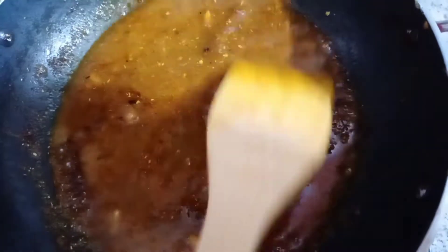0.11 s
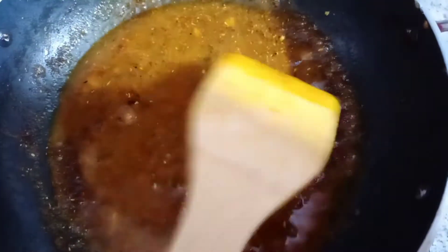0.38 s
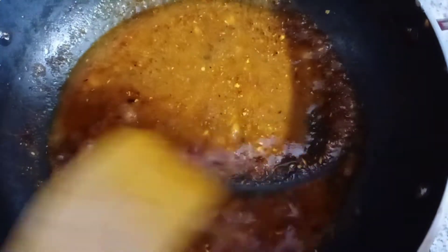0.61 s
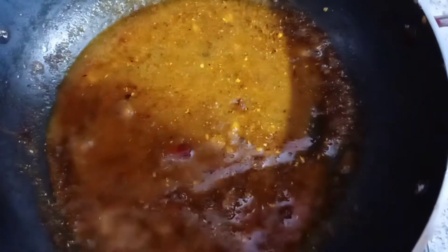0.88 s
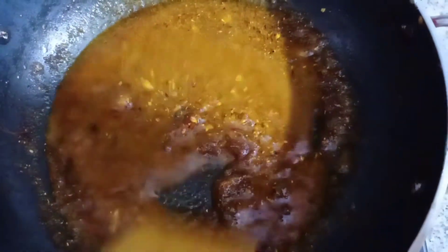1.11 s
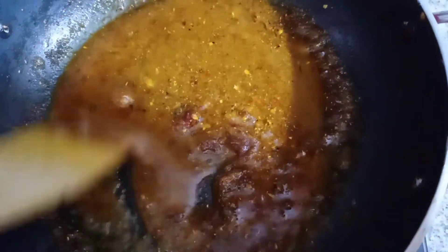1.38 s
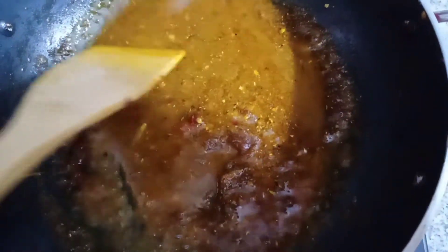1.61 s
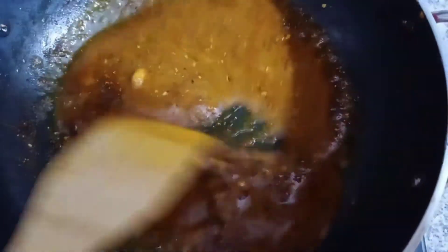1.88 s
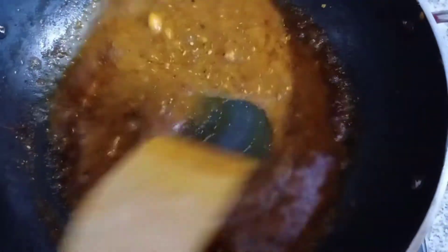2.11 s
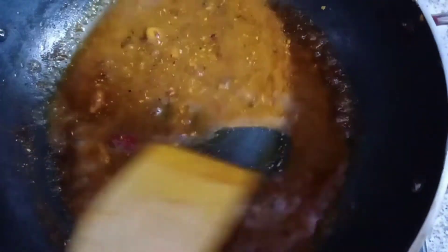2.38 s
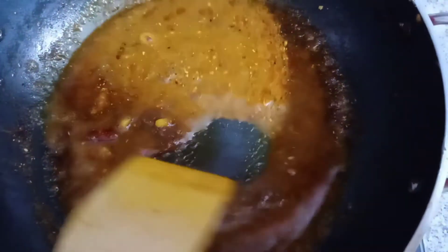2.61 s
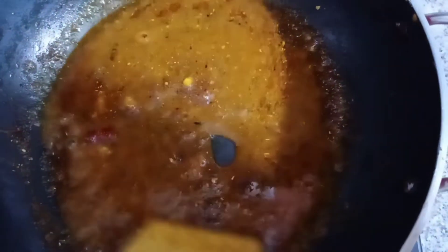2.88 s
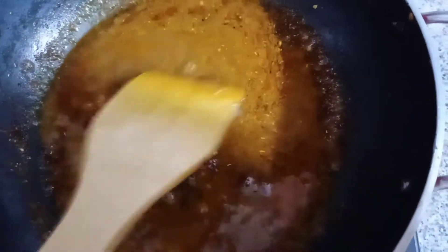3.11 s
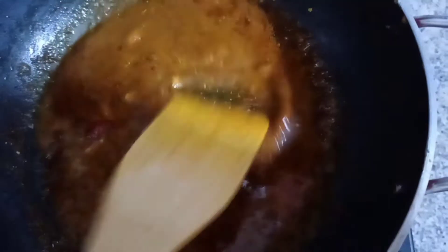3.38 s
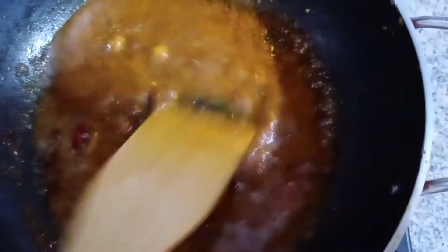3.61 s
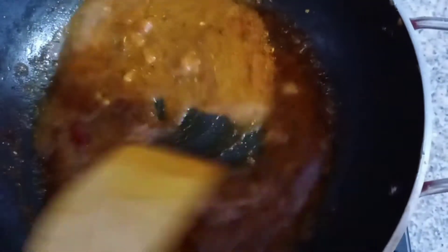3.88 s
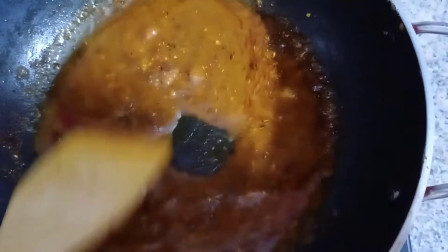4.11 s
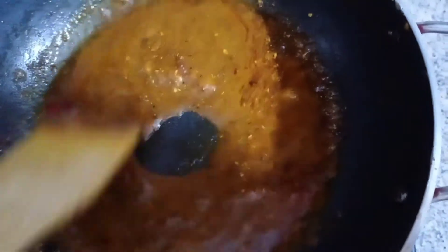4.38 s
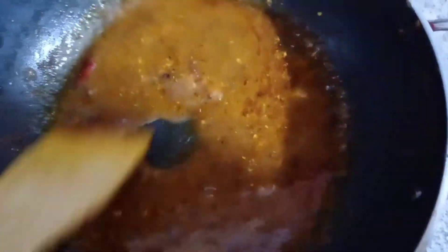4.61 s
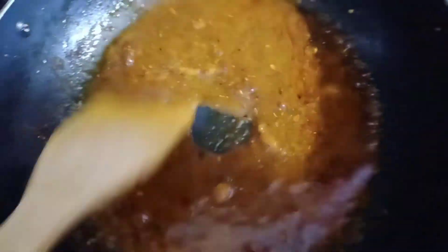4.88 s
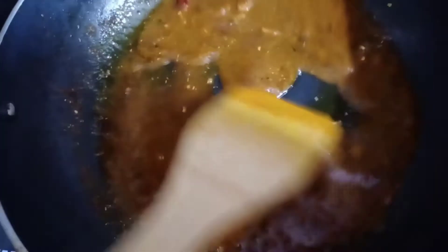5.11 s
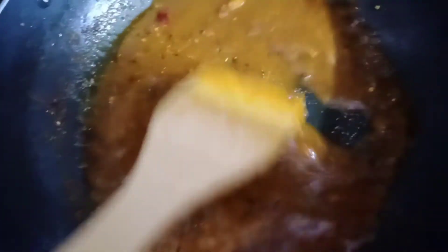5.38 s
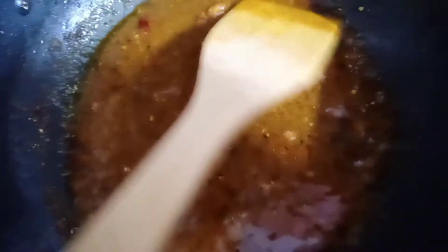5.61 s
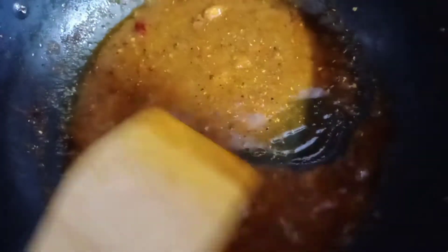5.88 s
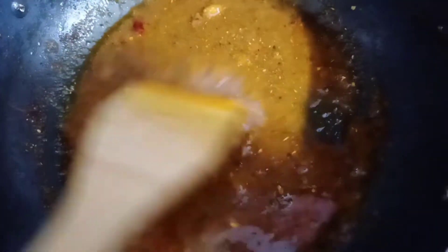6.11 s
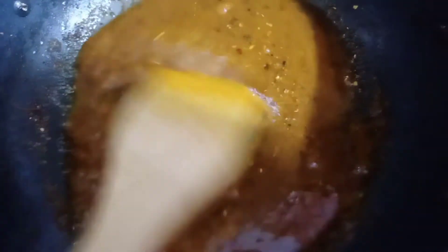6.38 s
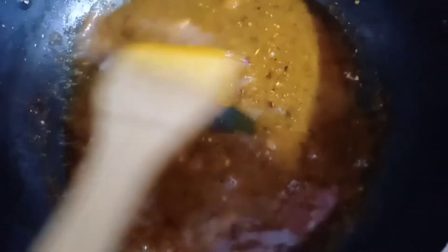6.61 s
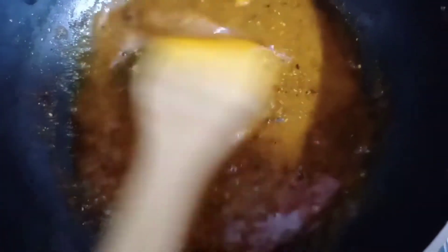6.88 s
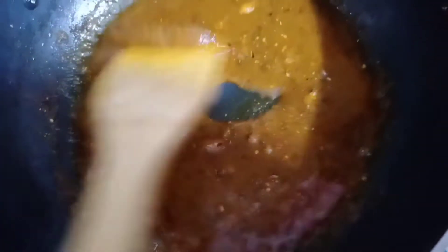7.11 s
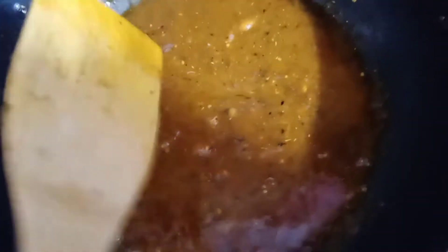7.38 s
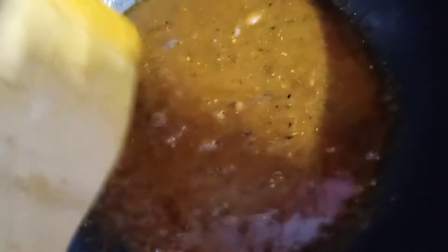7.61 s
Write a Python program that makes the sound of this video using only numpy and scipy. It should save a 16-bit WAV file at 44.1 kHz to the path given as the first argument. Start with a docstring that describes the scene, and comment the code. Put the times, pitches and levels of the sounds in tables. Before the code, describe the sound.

Thin sauce sizzles and fizzes steadily in a pan, close up, with wet bubble pops, hollow pan hums and soft dull wooden spatula scrapes.

```python
"""Thin sauce sizzling in a pan

Heard close to a phone: bubbles burst in clumps (tiny damped sines and patchy noise), fat spits in the treble.
A wooden spatula scrapes the bottom (filtered noise); boiling and nudges make the pan hum at its lowest mode.
A low kitchen rumble (filtered noise) lies beneath. Two microphone ports colour most of the sound differently.
"""
import sys
import numpy as np
from scipy import signal
from scipy.fft import rfft, irfft, next_fast_len
from scipy.io import wavfile
from scipy.ndimage import uniform_filter1d, map_coordinates

SR = 44100
rng = np.random.default_rng(int(sys.argv[2]) if len(sys.argv) > 2 else 0)


def field_ratio(decibels):
    """Amplitude ratio for a level in dB (20 dB per decade); scalars and array-likes work."""
    return 10 ** (np.asarray(decibels, dtype=float) / 20)


def store_wav(level_fs):
    """Save 16-bit WAV to argv[1]."""
    pcm = np.round(np.clip(np.atleast_2d(level_fs), -1, 1) * 32767)
    wavfile.write(sys.argv[1], SR, pcm.T.astype(np.int16))


N = 341851  # length in samples
TOP_HZ = 15500  # the phone's band limit

# modes of the pan, lowest first; that one's gain is not used: (pitch [Hz], width [Hz], gain [dB])
PAN_MODES = [(908, 67, 9), (1416, 22, 3.5), (1760, 30, -4), (1950, 210, -3.5), (2470, 34, -7)]


def unit(x):
    """Scaled to rms 1."""
    return x / np.sqrt(np.mean(x ** 2) + 1e-20)


def along(points, hz):
    """Each column after the first, read on a log frequency axis."""
    f, *cols = np.transpose(points)
    return np.array([np.interp(np.log(hz + 1), np.log(f + 1), c) for c in cols])


def curves(rows):
    """One value per sample for each column after the time."""
    s, *cols = np.transpose(rows)
    return [np.interp(np.arange(N) / SR, s, c) for c in cols]


def wobble(rate):
    """A smooth random curve, rate knots a second."""
    return map_coordinates(rng.standard_normal(N // 100), [np.arange(N) * rate / SR])


def flutter(rate):
    """A wobble without its slow drift."""
    x = wobble(rate)
    return x - uniform_filter1d(x, size=SR // 17)


def filtered(x, response):
    """x times a response of frequency."""
    m = next_fast_len(N + SR // 2)
    return irfft(rfft(x, m) * response(np.fft.rfftfreq(m, 1 / SR)), m)[..., :N]


def above(f, hz):
    """Steep high-pass gain."""
    return 1 / np.sqrt(1 + (hz / (f + 1)) ** 12)


def below(f, hz):
    """The matching low-pass gain: the powers of the two add up to 1."""
    return np.sqrt(1 - above(f, hz) ** 2)


def resonance(f, hz, width):
    """Causal resonance, gain 1 at its centre."""
    return 1j * f * width / (hz * hz - f * f + 1j * f * width)


def place(seconds, shapes):
    """Sums the rows of shapes, each starting at its time."""
    at = np.round(np.asarray(seconds) * SR).astype(int)[:, None] + np.arange(shapes.shape[1])
    return np.bincount(at.ravel(), shapes.ravel(), N + SR)[:N]


def bubbles(seconds, db, hz, life, rise):
    """Soft-started damped sines whose pitch climbs as the bubble opens."""
    u = np.arange(SR // 50)[None] / SR / life[:, None]  # time in lives
    cycles = (hz * life)[:, None] * u * (1 + rise * u)
    swell = np.e * 4 * u * np.exp(-4 * u)  # peaks at 1
    return place(seconds, field_ratio(db)[:, None] * swell * np.sin(2 * np.pi * cycles))


def swarm(count, hz, spread, cycles, size_db):
    """Random small bubbles of log-normal pitch and uneven level: one swarm near, one off the wall."""
    pair = []
    for _ in "ab":
        when, size = rng.random((count, 2)).T
        pitch = np.clip(hz * np.exp(spread * rng.standard_normal(count)), 550, SR / 3)
        db = -size_db * np.log(size + .005)  # with size_db above 0, a few are much louder than the rest
        life = np.minimum(cycles / pitch, .02)
        pair.append(unit(bubbles(when * N / SR, db, pitch, life, rise=.03)))
    return np.array(pair)


def seethe(patchy_db, clump_db, burst_db):
    """Countless tiny bursts: noise in random patches, clumps and brief bursts; direct and scattered."""
    z = signal.stft(rng.standard_normal((2, N)), nperseg=256)[2]
    field = uniform_filter1d(rng.standard_normal(z.shape[1:]), size=3, axis=0)  # patches in pitch
    field = uniform_filter1d(field, size=8, axis=1)  # and in time
    noise = signal.istft(z * field_ratio(patchy_db * unit(field)), nperseg=256)[1][:, :N]
    return unit(noise * field_ratio(clump_db * flutter(34) + burst_db * flutter(130)))


def ports(direct, scattered):
    """Both ports share the direct sound; what the pan's wall scatters differs between them."""
    # the two microphone ports: (frequency [Hz], left gain [dB], right gain [dB], likeness [0-1])
    port_response = [(504, -51, -44.5, 1), (829, -14, -17, 0.95), (1000, -14.5, -19, 0.65),
                     (1180, -8, -15, 0.8), (1950, -10.5, -14, 0.94), (3030, -9, -12, 0.96),
                     (3670, -2, -6, 0.96), (4270, -2.5, -7, 0.98), (5700, -11, -12.5, 0.8),
                     (6980, -4, -2.5, 1), (7500, -6.5, 0, 0.75), (9700, -22.5, -6, 0.56),
                     (10300, -16.5, -5, 0.54), (11450, -21, -8.5, 0.1), (13400, -3, -3.5, 0.75),
                     (15000, -0.5, 4, 0.83)]

    def gain(f):
        return field_ratio(along(port_response, f)[:2])

    def turn(f):
        return np.arccos(np.clip(along(port_response, f)[2], 0, 1)) / 2

    shared = filtered(direct, lambda f: gain(f) * np.cos(turn(f)))
    # the scattered sound has opposite signs at the two ports
    return shared + filtered(scattered, lambda f: gain(f) * np.sin(turn(f)) * [[1], [-1]])


def kitchen():
    """A low rumble, nearly the same at both ports; its upper part swells unevenly."""
    # colour of the rumble, relative: (frequency [Hz], density [dB per Hz])
    rumble_colour = [(20, -8), (55, -6.5), (86, 8.5), (115, 4), (170, -4), (300, -7.5), (560, -9),
                     (900, -34)]
    # level of the rumble before its slight wobble: (time [s], level [dB])
    rumble_level = [(0, -63.5), (0.5, -67.5), (3.3, -67), (3.6, -68.5), (3.9, -67), (7.75, -68.5)]
    rumble = filtered(rng.standard_normal((2, N)), lambda f: field_ratio(along(rumble_colour, f)))
    upper = filtered(rumble, lambda f: above(f, 160))
    mid, side = rumble + upper * (field_ratio(2 * wobble(9)) - 1)
    side = side * field_ratio(-15)
    both = unit(np.array([mid + side, mid - side]))
    return field_ratio(curves(rumble_level)[0] + 0.9 * wobble(16)) * both


def spatula():
    """Each stroke is rough friction noise through the dull wooden blade; trapped air gloops out."""
    # strokes on the bottom, blade resonance applied twice:
    # (time [s], length [s], level before the port gains [dB], centre [Hz], width of one resonance [Hz])
    strokes = [(0.468, 0.084, -61.5, 440, 200), (0.82, 0.16, -62, 430, 45), (1.217, 0.1, -61, 425, 110),
               (1.588, 0.11, -55, 320, 298), (3.36, 0.12, -68, 417, 150), (5.51, 0.035, -60, 260, 160),
               (5.52, 0.12, -54.5, 430, 420), (5.94, 0.038, -53, 560, 450), (5.963, 0.087, -54, 384, 130)]
    # air trapped under the blade escapes:
    # (time [s], peak before the port gains [dB], starting pitch [Hz], life [s])
    gloops = [(0.49, -38, 720, 0.017), (5.932, -38.5, 585, 0.0185), (5.934, -39, 770, 0.017)]
    t, out = np.arange(N) / SR, np.zeros(N)
    for s, length, db, hz, width in strokes:
        rub = rng.standard_normal(N) * field_ratio(3 * wobble(60))
        blade = filtered(rub, lambda f: resonance(f, hz, width) ** 2)
        blade = blade / np.std(blade[(t > s) & (t < s + length)])
        swell = np.sin(np.pi * np.clip((t - s) / length, 0, 1) ** 0.8) ** 1.6
        out += field_ratio(db) * blade * swell
    out = out + bubbles(*np.transpose(gloops), rise=0.305)
    return field_ratio([[1.2], [-1.2]]) * out  # left and right port


def pan():
    """The boiling keeps the pan's lowest mode humming unevenly; a nudge drives it hard for a moment."""
    # level of the hum before its unrest and the port gains: (time [s], level [dB])
    hum_level = [(0, -57.5), (1.6, -63.5), (2.2, -50), (2.8, -54), (3.2, -72), (3.6, -47.5), (4.7, -52.5),
                 (5.2, -55.5), (5.7, -61), (6.3, -50.5), (7.1, -52.5), (7.75, -85)]
    # nudges that ring the pan, pitch under the sloshing sauce:
    # (time [s], peak before damping and port gains [dB], push [s], starting pitch [Hz])
    nudges = [(1.307, -38.5, 0.061, 894), (1.372, -37, 0.023, 870), (1.8, -40, 0.05, 907),
              (1.83, -37, 0.035, 860), (1.915, -46, 0.032, 885), (2.031, -24.5, 0.04, 908),
              (2.165, -43.5, 0.083, 927), (2.234, -47, 0.054, 910), (2.305, -46, 0.035, 904),
              (2.43, -37.5, 0.07, 885), (2.47, -41, 0.056, 900), (2.495, -37.5, 0.075, 912),
              (2.635, -34.5, 0.053, 905), (2.998, -36, 0.05, 906), (3.317, -43, 0.04, 910),
              (3.37, -41.5, 0.059, 876), (3.572, -50, 0.033, 905), (3.681, -36, 0.044, 935),
              (3.789, -38, 0.036, 920), (3.897, -44, 0.03, 930), (3.97, -41.5, 0.062, 905),
              (4.118, -39, 0.078, 904), (4.196, -34.5, .06, 911), (4.367, -44, 0.039, 946),
              (4.577, -43, 0.06, 904), (4.666, -44.5, 0.078, 914), (6.506, -43, 0.059, 926),
              (6.909, -39, 0.021, 872)]
    hz, width, _ = PAN_MODES[0]
    unrest = 2.2 * wobble(18)  # dB
    mode = filtered(rng.standard_normal(N), lambda f: resonance(f, hz, width) ** 2)
    hum = field_ratio(curves(hum_level)[0] + unrest) * unit(mode)
    s, db, push, loaded = np.transpose(nudges)
    t = np.arange(SR // 10) / SR
    swell = np.sin(np.pi * np.clip(t / push[:, None], 0, 1) ** 0.58) ** 2
    drift = rng.standard_normal((len(s), 1))  # the pitch glides a little, up or down
    tone = np.sin(2 * np.pi * loaded[:, None] * (1 + 0.078 * drift * t) * t)
    rings = place(s, field_ratio(db)[:, None] * swell * tone)
    rings = rings * field_ratio(1.7 * wobble(70))  # the sauce damps it unevenly
    return field_ratio([[2.2], [-2.8]]) * (hum + rings)  # left and right port


def pops():
    """A large bubble rings briefly or cracks as its skin tears; a spit is a short treble burst."""
    # large bubbles that ring: (time [s], peak before the ports [dB], starting pitch [Hz])
    ringing = [(1.3012, -17, 2020), (1.4621, -21, 3670), (2.222, -17, 1880), (2.471, -15.5, 2600),
               (4.208, -24, 1920), (4.25, -23, 1800), (4.264, -21, 1660), (4.276, -15, 2060),
               (4.2833, -11, 1760), (4.3, -17, 1800), (4.325, -12, 1820), (4.5555, -18.5, 1900),
               (4.754, -23, 1650), (4.779, -19, 1640), (4.791, -16, 1700), (4.856, -17, 2000),
               (4.904, -21, 4140), (5.97, -19, 1950), (5.984, -19, 1950), (6.0097, -17, 1920),
               (6.174, -21.5, 3730), (6.222, -15, 2050), (7.1192, -22, 1860), (7.635, -21, 3610)]
    # bubbles that tear with a crack: (time [s], level before filters and ports [dB], lowest frequency [Hz])
    cracking = [(0.609, -5.5, 1500), (2.689, -18, 1500), (4.0991, -4, 2500), (4.361, -7.5, 2550),
                (4.8564, -8, 1200), (5.344, -6.5, 2500), (5.969, -2, 2200), (5.9704, -17, 1500),
                (6.0102, -7, 1500), (6.404, -13, 1200), (6.4955, -1, 3400), (7.635, -14, 2500)]
    # spits of fat: (time [s], level before filter and ports [dB])
    spitting = [(0.125, -23), (0.272, -19), (0.3032, -19), (1.1613, -24), (1.2316, -23), (1.5314, -19),
                (2.949, -18), (3.7834, -16), (7.187, -23), (7.426, -24)]
    pop_life_s, spit_life_s, crack_t60_s = 0.0055, 0.0049, 0.0075
    # three quieter neighbours gurgle around each ringing bubble; pitch spread is a fraction
    neighbour_db, neighbour_s, neighbour_spread = -9, 0.014, 0.07

    s, db, hz = np.transpose(ringing)
    shift, off = rng.standard_normal((len(s), 2, 3)).transpose(1, 0, 2)
    near_s = (s[:, None] + neighbour_s * shift).ravel()
    near_db = np.repeat(db + neighbour_db, repeats=3)
    near_hz = (hz[:, None] * (1 + neighbour_spread * off)).ravel()
    near = bubbles(near_s, near_db, near_hz, np.full(off.size, pop_life_s), rise=0.019)
    large = bubbles(s, db, hz, np.full(len(s), pop_life_s), rise=0.0056)

    at, crack_db, lowest = np.transpose(cracking)
    t = np.arange(SR // 50) / SR
    skin = rng.standard_normal((len(at), len(t))) + 3.5 * (t == 0)  # a snap, then tearing
    tear = field_ratio(crack_db[:, None] - 60 * t / crack_t60_s) * skin
    torn = [signal.lfilter(*signal.butter(2, low * 2 / SR, "high"), row) for row, low in zip(tear, lowest)]
    crack = filtered(place(at, np.array(torn)), lambda f: below(f, 4300))

    s, db = np.transpose(spitting)
    u = t / spit_life_s
    burst = np.e * 4 * u * np.exp(-4 * u) * rng.standard_normal((len(s), len(t)))
    spit = place(s, field_ratio(db[:, None]) * burst)
    spit = filtered(spit, lambda f: 1 / np.sqrt(1 + (10000 / (f + 1)) ** 4))  # treble only

    direct = large + near + crack + spit
    wall = rng.standard_normal(len(t)) * field_ratio(-60 * t / 0.0068)  # a very short echo tail
    return ports(direct, signal.fftconvolve(direct, wall / np.linalg.norm(wall))[:N])


def sizzle():
    """Bubbling, spitting and spray share the surges of the boiling edge; the bubbling also shakes the pan."""
    # how hard the sauce fries at its hot edge, heard as the spitting: (time [s], level [dB])
    boil = [(0.0, -35.5), (0.3, -37), (0.62, -37.5), (0.88, -38), (0.97, -35), (1.49, -33), (1.85, -34),
            (1.92, -39.5), (2.37, -41), (3.28, -38.5), (4.3, -42.5), (4.6, -39.5), (5.2, -39.5),
            (5.74, -40.5), (5.96, -46.5), (6.2, -42.5), (6.52, -41), (7.75, -41)]
    # level of the fizz, the brighter part of the bubbling, before surges: (time [s], level [dB])
    fizz_level = [(0, -37), (0.75, -36), (1.1, -35.5), (1.5, -35), (1.85, -35.5), (2.35, -41), (3.0, -38.5),
                  (4.3, -39.5), (4.8, -38), (5.8, -36.5), (6.1, -41), (6.6, -37.5), (7.75, -39)]
    # level of the low gurgles put into the bubbling, before its filters: (time [s], level [dB])
    gurgle_level = [(0, -10.5), (1, -14.5), (2, -17.5), (3.8, -23), (4.8, -12.5), (6, -14.5), (7.75, -16.5)]
    split_low_hz, split_high_hz = 5430, 10250  # bubbling, spitting and spray part here
    fizz_hz = 2620  # the fizz lies above
    calm_db = -40  # spitting level of calm frying

    # levels at calm frying, and their rise per dB of harder frying
    spitting_db, = curves(boil)
    harder_db = spitting_db - calm_db
    bubbling_db = -39.5 + 0.04 * harder_db
    spray_db = -45.5 + 1.94 * harder_db
    surge = flutter(38)
    # sharp ticks through the treble
    crackle = swarm(count=2500, hz=9000, spread=0.4, cycles=1.5, size_db=3)

    low = seethe(patchy_db=0.9, clump_db=1.1, burst_db=1.4)
    low = low + 0.35 * swarm(count=9000, hz=3500, spread=0.4, cycles=3, size_db=2.8)
    # some bubbles, of much the same pitch, sing longer
    low = low + 0.5 * swarm(count=7000, hz=3600, spread=.33, cycles=60, size_db=1.2)
    gurgles = swarm(count=1400, hz=695.4, spread=0.149, cycles=13.3, size_db=-2.0)
    low = filtered(low, lambda f: above(f, 815)) + field_ratio(curves(gurgle_level)[0]) * gurgles

    mid = seethe(patchy_db=1.6, clump_db=0.6, burst_db=1.1)
    mid = mid + 0.3 * swarm(count=5000, hz=8660, spread=0.18, cycles=5, size_db=3.5)
    mid = mid + 0.4 * crackle
    mid = mid + 0.5 * swarm(count=3500, hz=7600, spread=.2, cycles=100, size_db=2)

    top = seethe(patchy_db=3, clump_db=2.5, burst_db=1)
    top = top + 0.3 * swarm(count=3000, hz=13500, spread=0.24, cycles=5.3, size_db=4) + 0.4 * crackle
    # harder frying fills in to a dense hiss
    top = field_ratio(-0.6 * harder_db) * top + 0.45 * seethe(patchy_db=1, clump_db=1, burst_db=1)

    def shaken(f):
        return 1 + sum(field_ratio(db) * resonance(f, hz, width) for hz, width, db in PAN_MODES[1:])

    low = ports(*filtered(low, lambda f: shaken(f) * below(f, split_low_hz)))
    mid = ports(*filtered(mid, lambda f: above(f, split_low_hz) * below(f, split_high_hz)))
    top = ports(*filtered(top, lambda f: above(f, split_high_hz) * (f < TOP_HZ)))

    fizz = filtered(low, lambda f: above(f, fizz_hz))
    bubbling = field_ratio(bubbling_db) * unit(low - fizz) + field_ratio(curves(fizz_level)[0]) * unit(fizz)
    bubbling = field_ratio(1.2 * surge) * bubbling
    mid = field_ratio(1.4 * surge + 0.9 * wobble(6)) * mid
    spits = field_ratio(spitting_db) * unit(mid)
    spray = field_ratio(spray_db + 2.4 * surge) * unit(top)
    return bubbling + spits + spray


def scene():
    """Everything as it reaches the two ports."""
    return kitchen() + spatula() + pan() + pops() + sizzle()


def low_pass(x):
    """Removes everything above the highest recorded frequency."""
    return signal.sosfilt(signal.butter(12, 16730, fs=SR, output="sos"), x)


def record(dry):
    """The phone keeps nothing above its band limit."""
    mix = filtered(dry, lambda f: f < TOP_HZ)
    return low_pass(mix)


dry = scene()
out = record(dry)
store_wav(out)
```